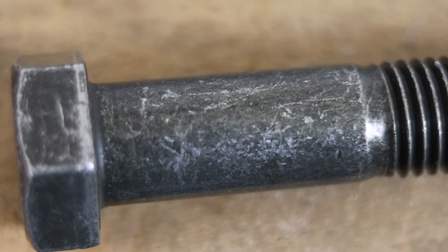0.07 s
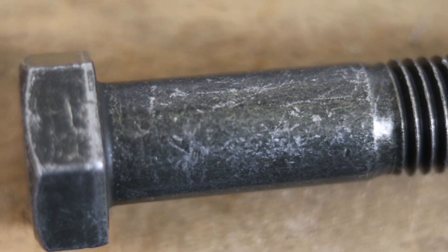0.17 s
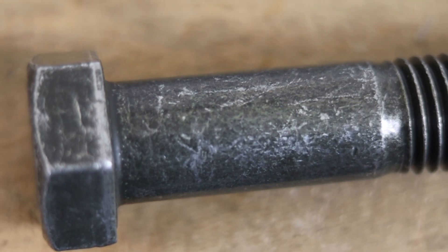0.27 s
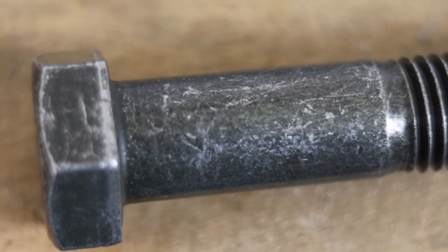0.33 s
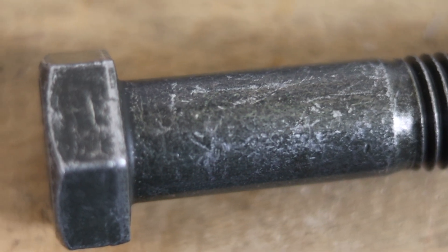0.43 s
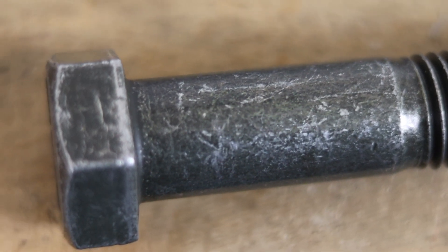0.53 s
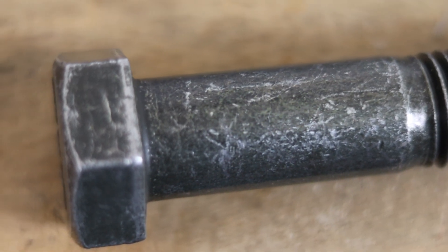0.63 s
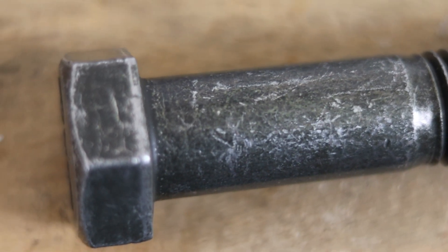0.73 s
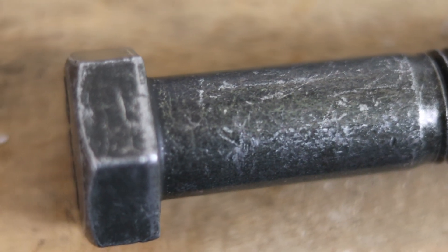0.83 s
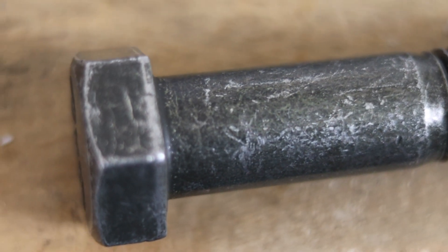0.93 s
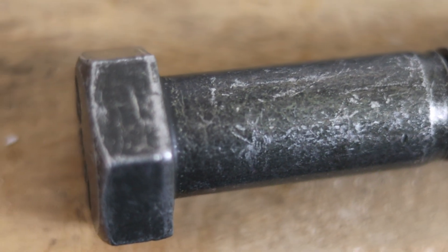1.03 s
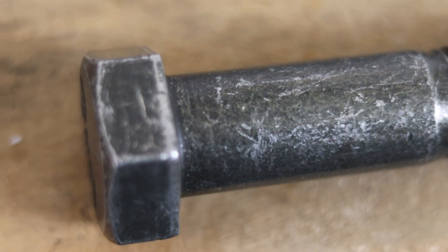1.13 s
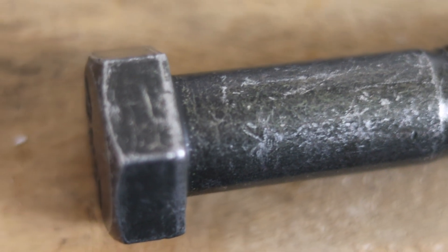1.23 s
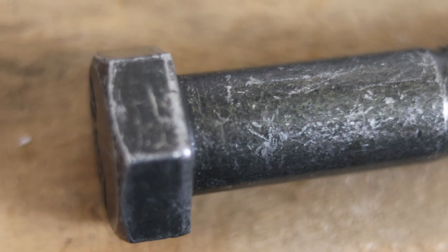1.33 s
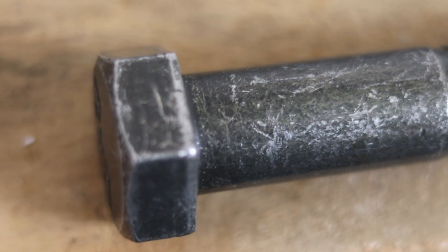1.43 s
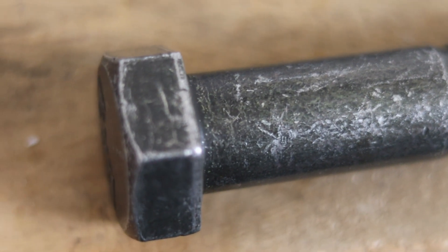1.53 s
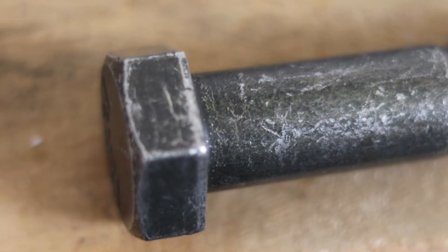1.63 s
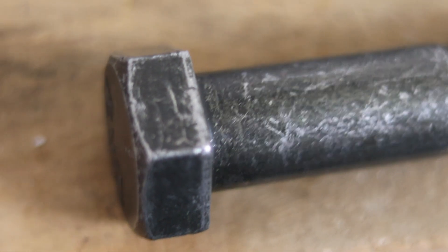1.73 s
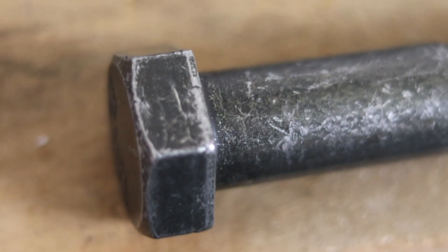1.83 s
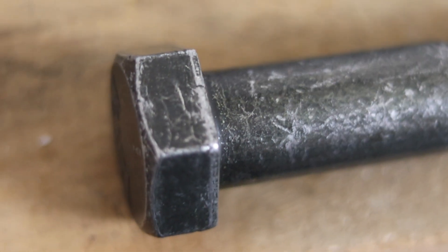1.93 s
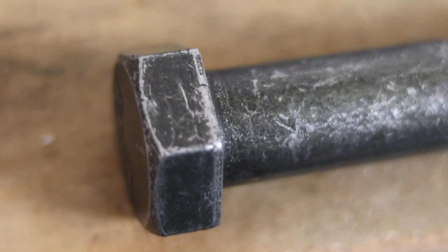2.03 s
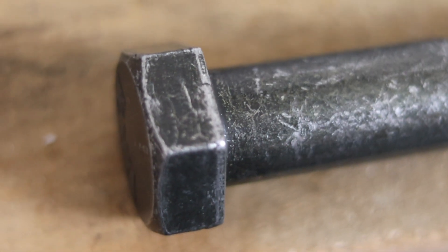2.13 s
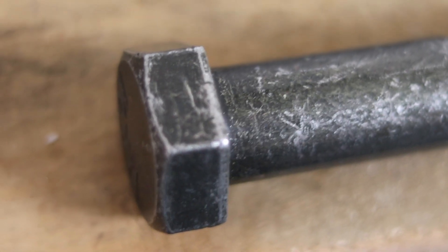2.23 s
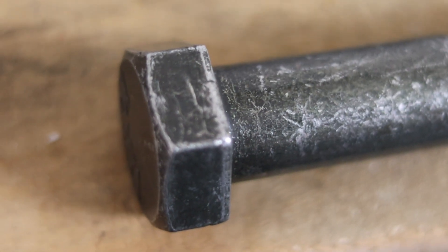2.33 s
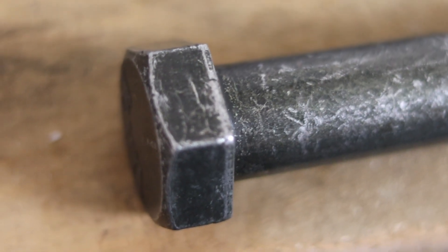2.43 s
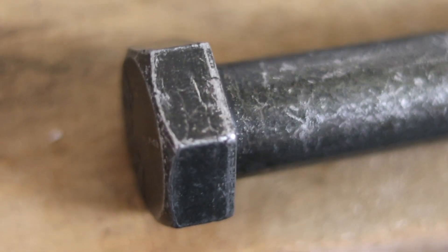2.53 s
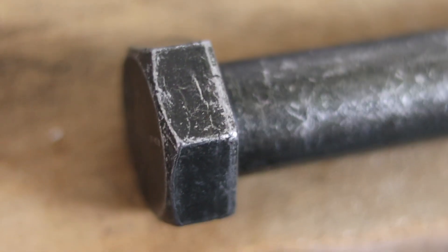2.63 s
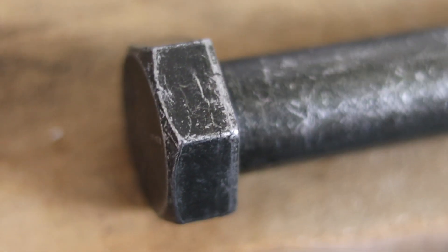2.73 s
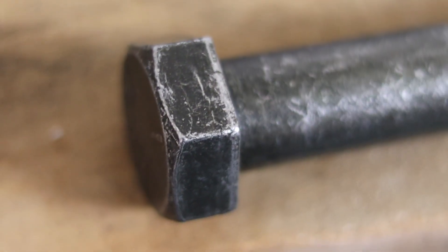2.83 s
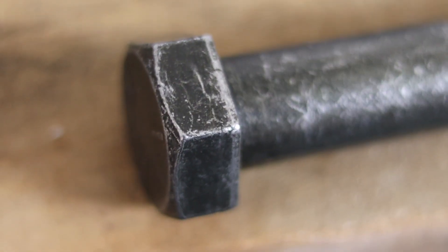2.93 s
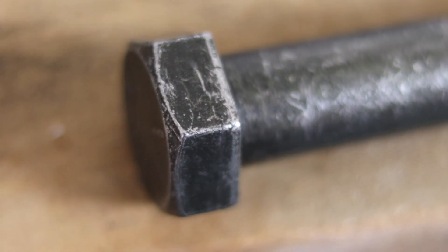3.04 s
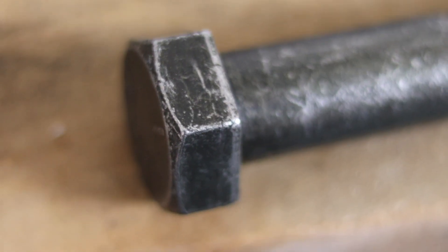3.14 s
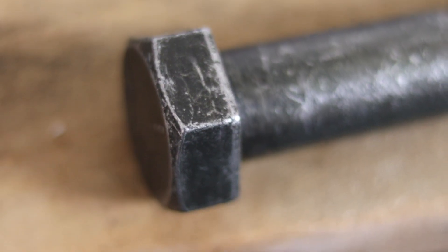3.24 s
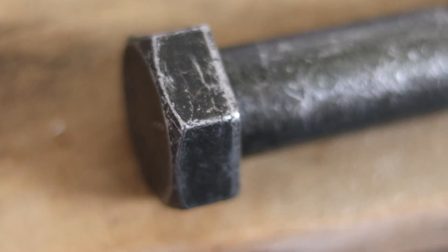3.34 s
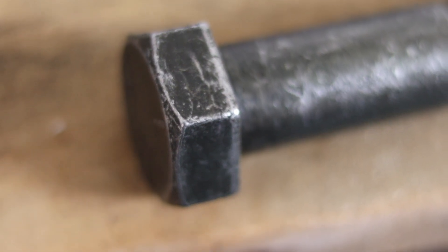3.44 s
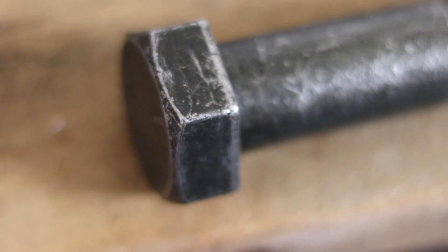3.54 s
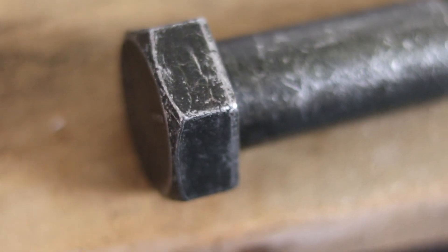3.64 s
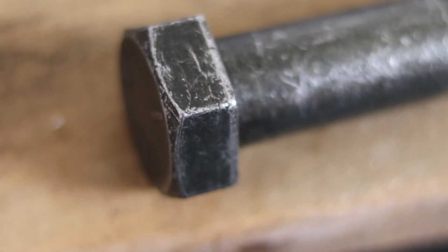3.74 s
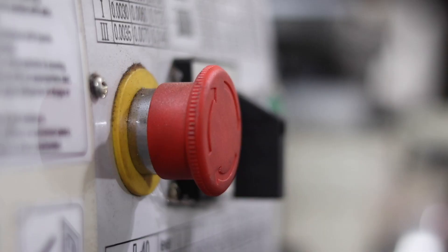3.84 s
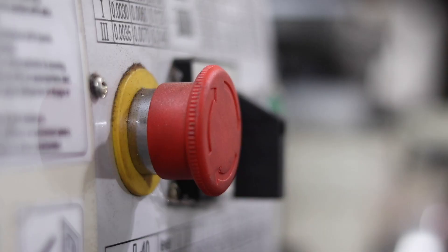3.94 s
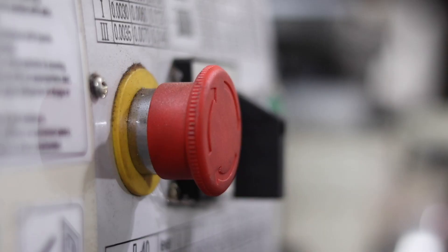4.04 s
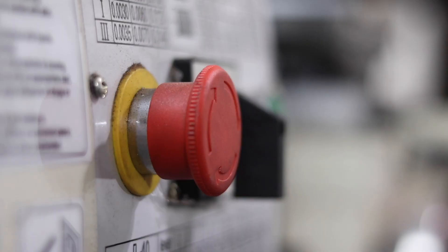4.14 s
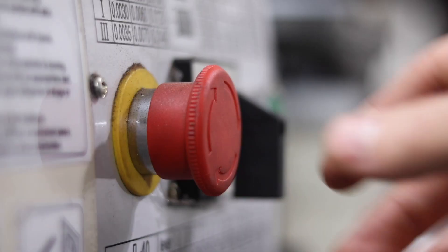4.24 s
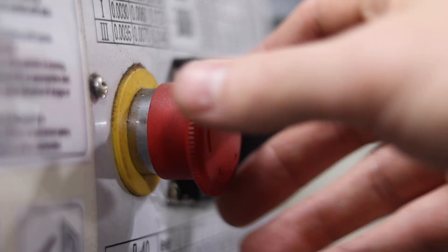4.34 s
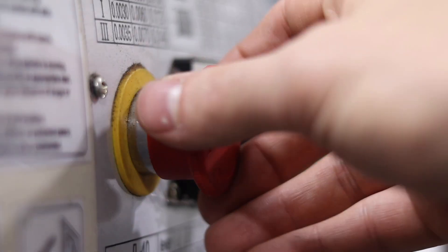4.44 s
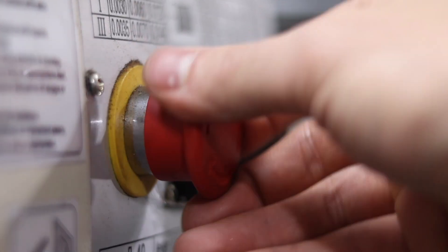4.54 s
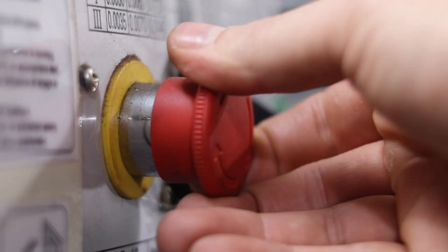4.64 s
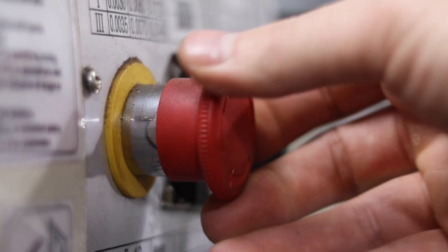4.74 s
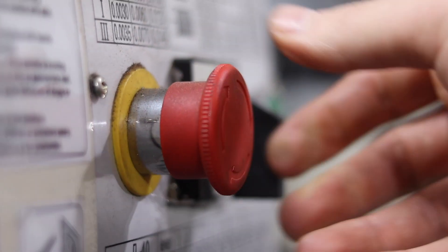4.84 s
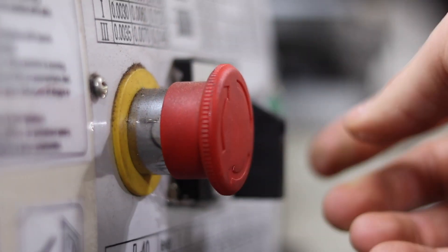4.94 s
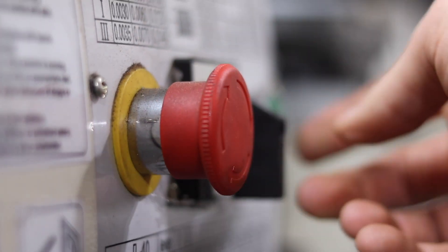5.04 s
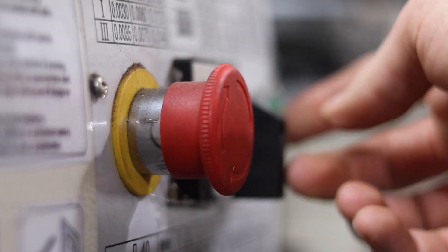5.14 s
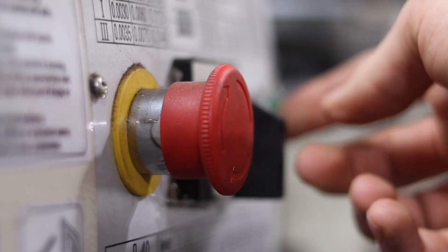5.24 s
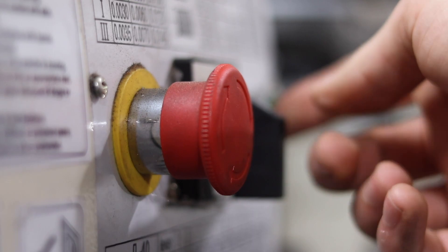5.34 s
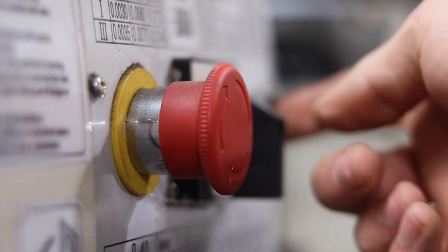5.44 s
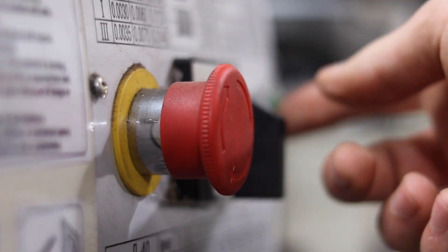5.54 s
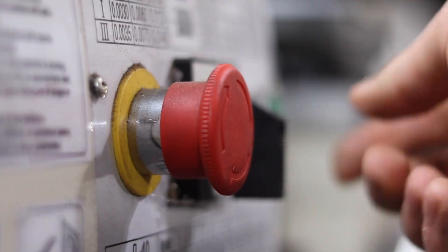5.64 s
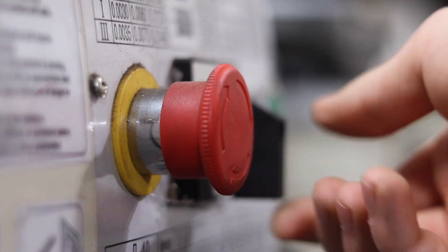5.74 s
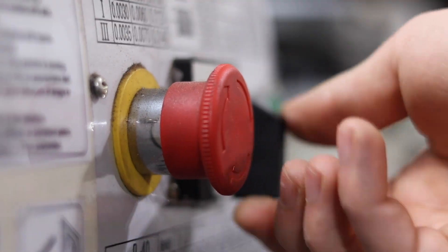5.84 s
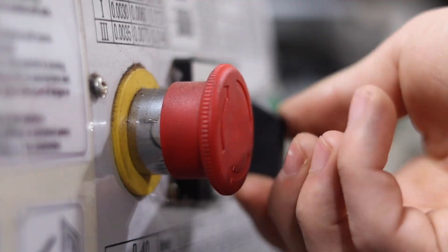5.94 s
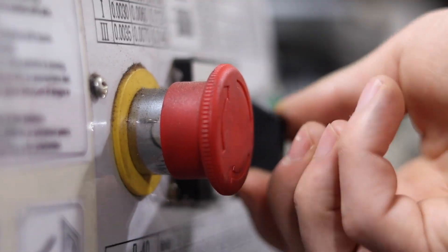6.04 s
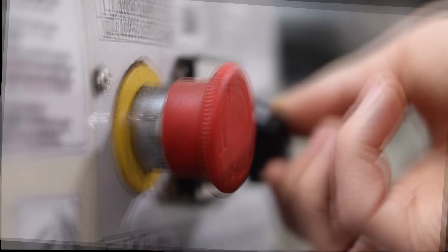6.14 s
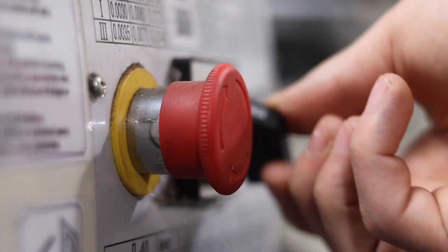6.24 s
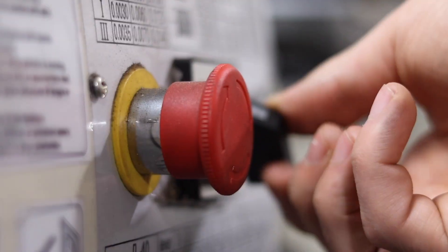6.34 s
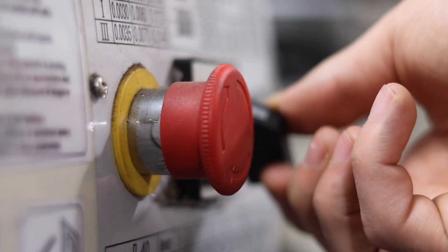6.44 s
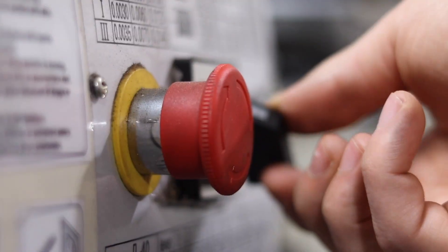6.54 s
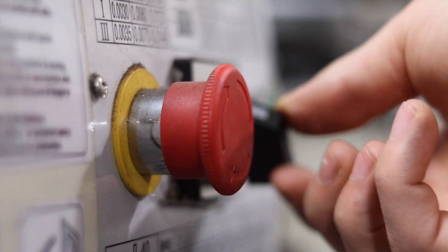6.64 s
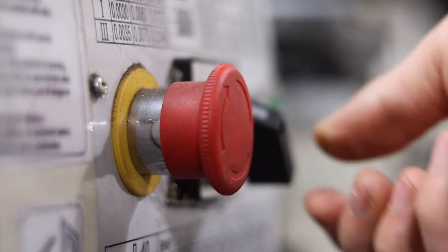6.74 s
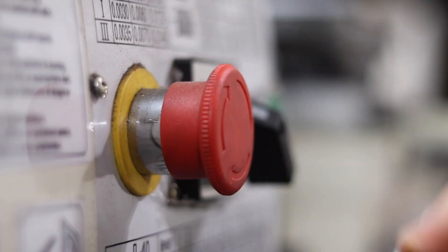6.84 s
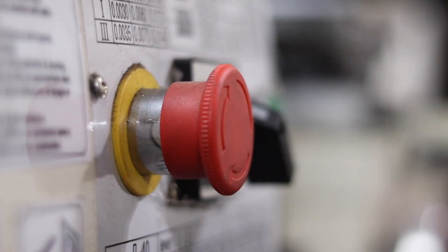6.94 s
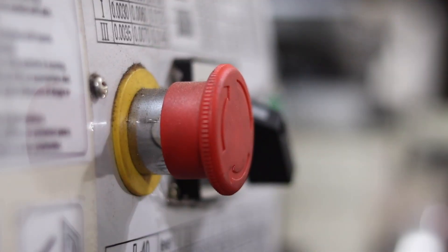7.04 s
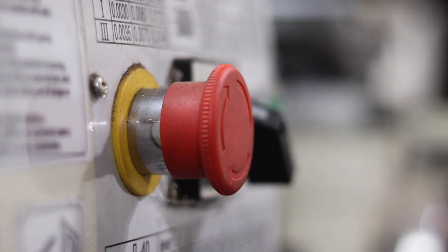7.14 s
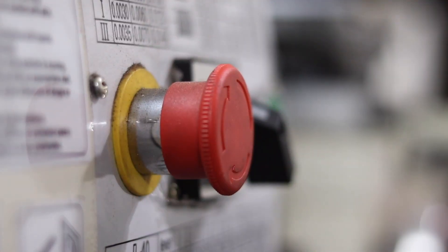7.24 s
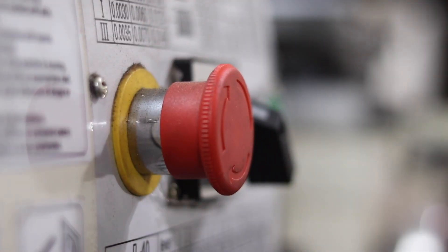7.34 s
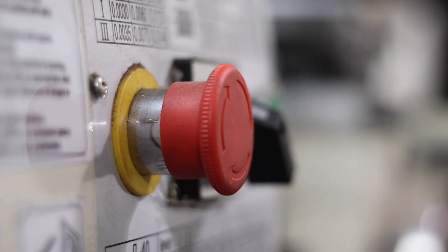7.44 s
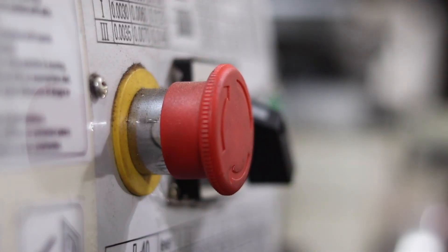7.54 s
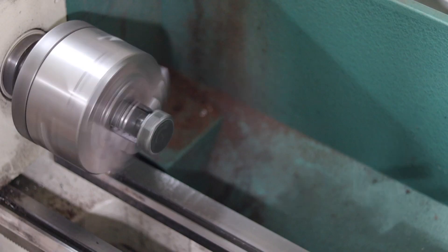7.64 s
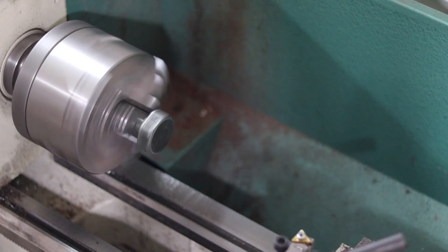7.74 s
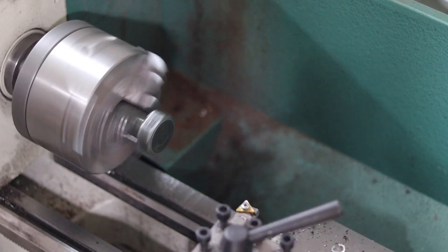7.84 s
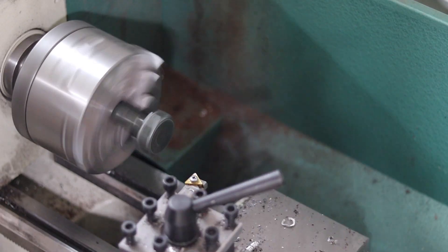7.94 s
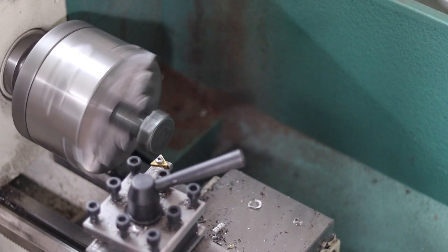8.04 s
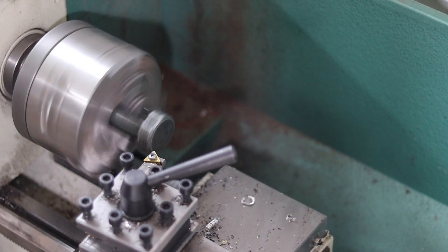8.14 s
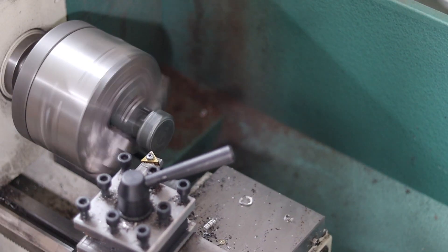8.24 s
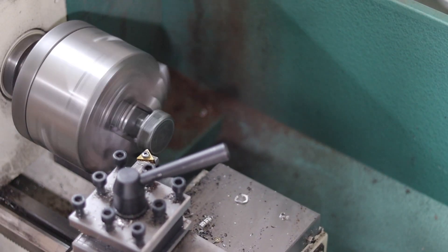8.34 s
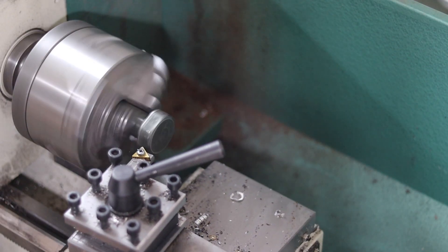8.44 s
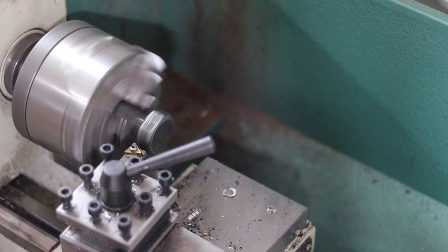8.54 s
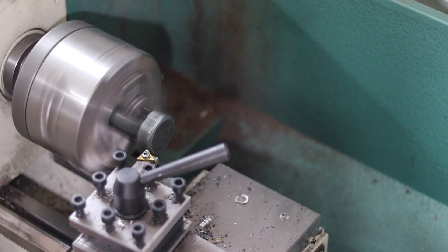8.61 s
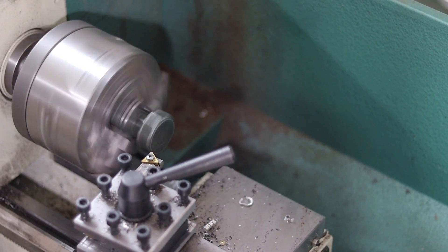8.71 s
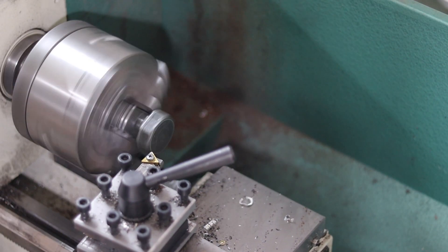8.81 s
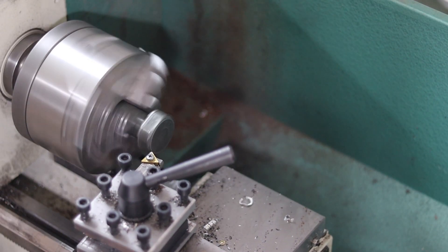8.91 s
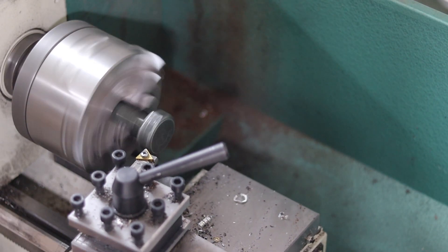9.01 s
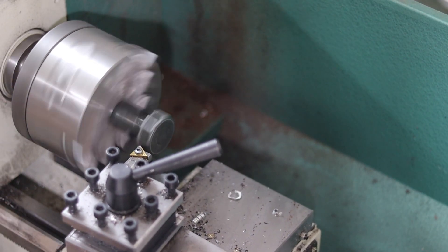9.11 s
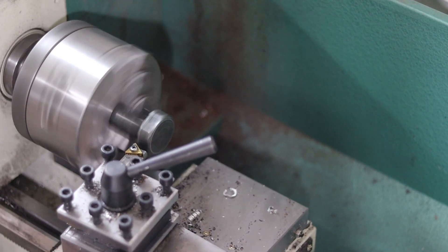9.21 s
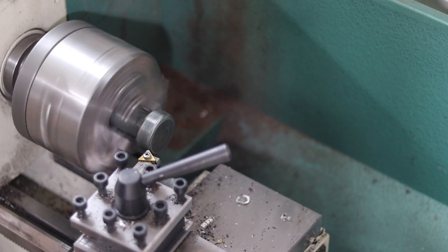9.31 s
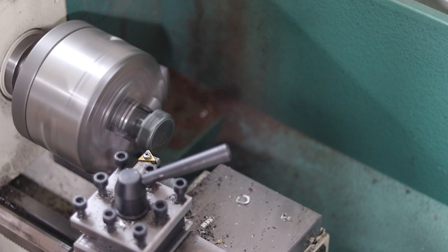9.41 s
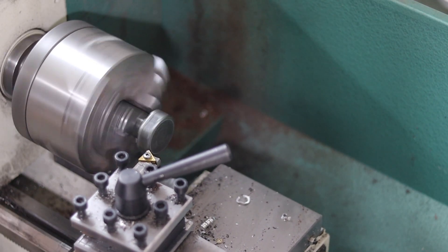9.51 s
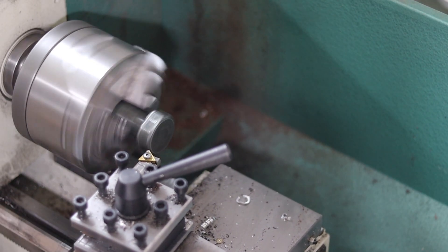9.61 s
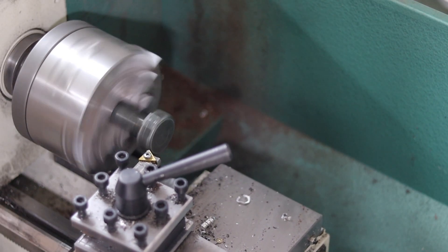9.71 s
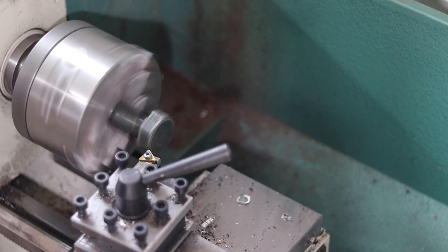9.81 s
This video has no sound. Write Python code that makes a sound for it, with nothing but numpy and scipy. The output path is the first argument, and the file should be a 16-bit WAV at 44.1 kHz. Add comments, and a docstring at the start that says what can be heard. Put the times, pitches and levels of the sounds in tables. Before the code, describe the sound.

Workshop fan hum cuts off, a stop button snaps loose, a contactor clacks, then a metal lathe growls up to speed and whines.

```python
"""Workshop lathe starting up

A workshop fan hums and breaks off. On a metal lathe the stop button snaps free, a contactor clacks in and a
switch is thrown: the motor growls up to speed and the gears whine, their tooth errors repeating every turn.
Then the lathe is heard from beside the chuck, throbbing in another gear, while the tool slide clinks.
Tones locked to the turning shaft make the whine, filtered noise the rush and scraping, and short noise bursts
with ringing modes the blows.
"""
import sys
import numpy as np
from scipy import signal
from scipy.fft import rfft, irfft
from scipy.io import wavfile

SR = 44100
rng = np.random.default_rng(int(sys.argv[2]) if len(sys.argv) > 2 else 0)


def generate_wav(signal):
    """Clip the signal to [-1, 1] and save it as 16-bit WAV at the path in sys.argv[1]."""
    frames = np.transpose(np.atleast_2d(signal))
    scaled = np.clip(frames, -1, 1) * 32767
    pcm = np.round(scaled).astype(np.int16)
    wavfile.write(sys.argv[1], SR, pcm)


N = 435282
T = np.arange(N) / SR  # time in s
FREQ = np.maximum(np.arange(N // 2 + 1) * SR / N, 1)  # frequencies of the spectrum in Hz

START_S, CHUCK_S = 6.21, 7.64  # the switch is thrown; the lathe is heard from beside the chuck
CHUCK_TURN_HZ = 6.52  # turning rate of the chuck

# headstock resonances: f/Hz, half-width/Hz, level/dB
HEADSTOCK = [(214, 77, -8.5), (363, 60, -9.5), (508, 75, -6), (700, 44, 6), (748, 35, 4.5), (787, 13, -18),
             (1010, 59, -12), (1446, 43, -11.5)]
# resonances shaken by the starting motor and by heavy blows: f/Hz, half-width/Hz, level/dB
MOUNT = [(187, 33, -0.5), (253, 12, 0), (362, 55, -10), (495, 62, -8), (622, 54, -7), (824, 40, -4.5),
         (955, 130, -12), (1760, 250, -20.5)]


def lathe_start(clatter_db=-25, rumble_db=-28, growl_db=-3, groan_db=0, slot_db=-7, throb_db=3,
                pan_db=.5, lumpy_db=1.0):
    """The motor strains against its mounts, then the gears settle into a whine."""
    # gear tones: multiple of the shaft rate, level/dB; the mesh, its harmonics and their sidebands
    gear_rows = [(16, -41), (32, -36.5), (44, -42), (48, -19.5), (49, -40), (90, -31), (91, -31), (92, -36),
                 (94, -33), (96, -26), (99, -34), (100, -33.5), (144, -42.5), (197, -46)]
    # steady colour of the casing: f/Hz, level per Hz/dB
    casing_colour = [(500, -28.5), (850, 3.5), (938, -18), (1100, -9), (1240, -14.5), (1460, -11),
                     (1630, -15.5), (2140, -14), (3240, -19.5), (8140, -28), (10000, -34.5), (15000, -39),
                     (16000, -41)]
    # casing resonances that the rotor-slot whine sweeps through: f/Hz, half-width/Hz, level/dB
    motor_shell = [(1450, 170, -3), (1850, 100, 0), (2200, 170, -4), (2540, 120, -6)]
    mesh_hz, teeth = 357.9, 48  # tooth contacts per second at full speed, contacts per turn
    casing_db, strained_casing_db = -30, -19.5

    speed, strain, load_db = run_up()
    turns = np.cumsum(mesh_hz * speed) / SR / teeth
    # count the turns from 7.19 s and let the shaft waver slightly
    turns = turns - np.interp(7.19, T, turns) + 0.000384 * walk(6.0)
    body, mount, casing = resonances(HEADSTOCK), resonances(MOUNT), colour(casing_colour)

    # the off-centre wheel presses harder once a turn
    throb = undb(throb_db * np.cos(2 * np.pi * turns))
    clatter = throb * (undb(clatter_db) * tooth_errors(turns, body) + undb(rumble_db) * noise(body))
    # the clean whine comes through mainly near full speed
    whine = gear_tones(turns, gear_rows, 0.0806) * speed ** 4
    gears = (whine + clatter) * undb(load_db)

    # teeth scrape, harder under strain, partly in the same way at every turn
    repeating = tooth_errors(turns, casing / (1 + (FREQ / 5000) ** 2))
    scrape = noise(casing) + undb(-6.5) * repeating
    scrape = scrape * (undb(casing_db) + strain * undb(strained_casing_db))

    # the rough mesh groans as it sweeps through the mount's resonances
    mesh_phase = 2 * np.pi * teeth * turns
    rough_mesh = np.sin(mesh_phase + 1.1 * walk(50))
    groan = undb(groan_db) * irfft(rfft(rough_mesh) * mount, N)
    # the rotor slots sing at eight times the mesh and fall silent at full speed
    slot_tone = np.sin(8 * mesh_phase + 1.1 * walk(110)) * np.sqrt(1 - speed ** 2)
    slots = undb(slot_db) * irfft(rfft(slot_tone) * resonances(motor_shell), N)
    lumps = undb(lumpy_db * walk(40))
    growl = strain * ((undb(growl_db) * noise(mount) + groan) * lumps + slots)
    return (gears + scrape + growl) * between(START_S, CHUCK_S) * undb([[pan_db], [-pan_db]])


def run_up():
    """The motor kicks in at part speed and gains speed exponentially until it locks, straining as it starts.

    Returns the share of full speed, the strain (gain) and the gear load (dB).
    """
    kick_share, run_up_s = .385, .23
    # strain: attack, hold, a quick release, and a part that lingers while the drive settles
    strain_db, rise_db, attack_s, hold_s, t60_s = -11.5, 18.5, 0.1, 0.19, 0.25
    linger_db, linger_t60_s = -5.5, 1.2
    # gear gain at full speed, its growth per doubling of speed, and its steady sag
    gear_db, gear_db_per_octave, sag_db_per_s = 3, 16, 1.56

    t, eased = since(START_S), since(START_S + hold_s)
    speed = kick_share ** np.maximum(1 - t / run_up_s, 0)
    attack = undb(strain_db - rise_db * np.maximum(1 - t / attack_s, 0))
    release = np.maximum(fade(eased, t60_s), undb(linger_db) * fade(eased, linger_t60_s))
    load_db = gear_db + gear_db_per_octave * np.log2(speed) - sag_db_per_s * t
    return speed, attack * release, load_db


def lathe_chuck(gears_db=0, clatter_db=-42, rumble_db=-39, rattle_db=3, wind_db=-39.5, gust_db=1.6):
    """Beside the chuck the gear tones beat at the shaft rate over bearing hiss and the jaws' wind."""
    # gear tones at the chuck: multiple of the shaft rate, level/dB
    gear_rows = [(49, -45.5), (53, -39), (54, -29.5), (55, -59), (56, -40), (107, -40), (108, -40.5),
                 (160, -54), (214, -53), (431, -56)]
    # colour of the bearing hiss: f/Hz, level per Hz/dB
    hiss_colour = [(500, -16), (850, 3), (882, -5), (1100, -3.5), (1200, -10), (1440, -5.5), (1630, -10),
                   (2830, -11), (3620, -14.5), (7380, -17.5), (11500, -29.5), (15000, -32), (16000, -39)]
    # colour of the wind: f/Hz, level per Hz/dB
    wind_colour = [(25, -13), (80, -8), (130, 0), (200, -5.5), (280, 5.0), (380, 7.5), (550, 2.0),
                   (820, 4), (1100, -30), (4000, -56)]
    shaft_hz, hiss_level_db = 361.8 / 54, -39

    turns = shaft_hz * (T - 8.15) + .0008 * walk(7.3)
    hiss_dip_db, gear_dip_db = dips()
    body = resonances(HEADSTOCK)
    gears = gear_tones(turns, gear_rows, 0.22) * undb(gears_db + gear_dip_db + 1.2 * walk(8))
    hum = chuck_hum() * undb(gear_dip_db + 1.5 * walk(4))
    # the gears rattle unevenly in their backlash
    rattle = undb(rumble_db + rattle_db * walk(40)) * noise(body, side_db=-9.5)
    clatter = undb(clatter_db) * tooth_errors(turns, body) + rattle
    # the wind swells once per turn of the chuck
    gusts = gust_db * np.cos(2 * np.pi * CHUCK_TURN_HZ * (T - 8.21))
    wind = undb(wind_db + gusts) * noise(colour(wind_colour), side_db=8.5)
    hiss = noise(colour(hiss_colour), side_db=-9.5) * undb(hiss_level_db + hiss_dip_db + .5 * walk(25))
    return (gears + hum + clatter + wind + hiss) * between(CHUCK_S - .005, 20)


def dips():
    """Changes of the hiss and gear levels (dB) at the chuck: each dip falls quickly and recovers slowly."""
    # brief dips: t/s, hiss level/dB, gear level/dB
    dip_rows = [(8.47, -5, -3.5), (9.19, -2.5, -5)]
    fall_s, recover_s = 0.0097, 0.23
    total = 0
    for s, *depths_db in dip_rows:
        course = np.minimum(since(s) / fall_s, 1) * np.exp(-since(s) / recover_s)
        total = total + np.outer(depths_db, course)
    return total


def chuck_hum():
    """Motor hum that beats with its sidebands once per turn of the chuck."""
    # hum: f/Hz, level/dB, level/dB of a sideband one chuck rate lower
    hum_rows = [(122, -49, -44.5), (243.5, -48, -52.5)]
    t = T - 8.21
    hum = 0
    for hz, db, sideband_db in hum_rows:
        hum = hum + undb(db) * np.cos(2 * np.pi * hz * t)
        hum = hum + undb(sideband_db) * np.cos(2 * np.pi * (hz - CHUCK_TURN_HZ) * t)
    return np.sqrt(2) * hum


def tooth_errors(turns, gain, size=8192):
    """Each tooth has its own error, so the same clatter comes round with every turn."""
    wheel = irfft(np.exp(2j * np.pi * rng.random(size // 2 + 1)))
    return shape(np.interp(turns % 1 * size, np.arange(size), wheel), gain)


def gear_tones(turns, rows, scatter):
    """Clean tones locked to the shaft; sidebands close to the strongest tone swell with it once a turn."""
    mesh = round(max(rows, key=lambda row: row[1])[0])
    tones = 0
    for k, db in rows:
        # start phases, in turns, scatter more the further a tone is from the strongest one
        phase = scatter * (round(k) - mesh) * rng.uniform(-1, 1)
        tones = tones + undb(db) * np.sqrt(2) * np.cos(2 * np.pi * (round(k) * turns + phase))
    return tones


def clicks(ring_db=-11, ring_growth=0.2, dull_t60=.52, bright_t60=0.26, contact_db=1, contact_t60=0.0062,
           crack_db=-2):
    """Plastic snaps: a hard contact, a crack, the housing's ring and a room tail that loses its treble first."""
    # colour of the plastic: f/Hz, level per Hz/dB
    plastic = [(60, -50), (160, -9), (330, -16), (620, -16), (850, -11.5), (1200, -7.5), (1800, -8.5),
               (2800, -17), (3800, -14.5), (6000, -22.5), (8300, -22), (10500, -29.5), (13700, -23),
               (16000, -34)]
    # modes of the button housing: f/Hz, level/dB, t60/s
    housing_modes = [(187, -0.5, 1.1), (487, 1, 1.13), (667.5, -12, 2.8), (780, -14, 2.3), (856, 6.5, 0.25),
                     (915, 11, 0.18), (1344, -9.5, .35), (1506, 1, 0.44), (1570, -17, 0.34),
                     (1755, 17.5, 0.1), (1900, -10, 0.59), (1906, -15, 0.68), (1944, 2, 0.21),
                     (2390, -14.5, 0.56), (3370, -1, 0.33), (4107, -14.5, 0.56)]
    # small dry ticks in the workshop: t/s, level/dB, pitch f/Hz
    tick_rows = [(1.794, -35.5, 1200), (1.832, -24, 1190), (2.099, -47, 2150), (2.469, -49, 2300),
                 (2.63, -50, 2500), (3.508, -45, 2600)]
    # fingers land on the controls: t/s, level/dB, pitch f/Hz
    touch_rows = [(4.387, -50, 2950), (4.572, -45.5, 1800), (4.592, -41.5, 1800), (5.386, -47.5, 2090),
                  (6.181, -37.5, 950)]
    # stop button and switch snap over: t/s, level/dB, room tail/dB, treble/dB, bass/dB, pitch f/Hz
    snap_rows = [(4.619, -22, -8.5, 6.5, 9.5, 1010), (4.720, -15, -13, -11.5, 3.5, 1700),
                 (4.803, -6, -15, -7, -11.5, 1930), (6.2004, -5.5, -17.5, 7, -6.5, 1120)]

    out, t = np.zeros((2, N)), T[:SR]
    crack_noise, bright = noise(colour(plastic), side_db=-8.5), noise(colour(plastic), side_db=2.5)
    dull = noise(colour(plastic) / (1 + (FREQ / 3000) ** 2), side_db=2.5)
    contact_noise = noise(colour(plastic) * (1 + FREQ / 7000), side_db=-13)

    def click(s, db, hz, t60, tail_db, treble_db, bass_db, pitch_db, overtone):
        """One click; the harder it is, the larger the housing's share of the sound."""
        housing = undb(ring_db + ring_growth * db) * ring(housing_modes)
        tail = stretch(bright) * fade(t, bright_t60) * undb(-2)
        tail = tail + stretch(dull) * fade(t, dull_t60) * undb(-4.5) + housing
        contact = undb(contact_db) * stretch(contact_noise) * fade(t, contact_t60)
        crack = undb(crack_db) * stretch(crack_noise) * fade(t, t60)
        onset = 1 - np.exp(-t / 0.00014)
        snap = (contact + crack + undb(tail_db) * tail) * onset
        add(out, s, undb(db) * tone(knock(snap, hz, pitch_db, overtone), treble_db, bass_db))

    for s, db, hz in tick_rows:
        click(s, db, hz, t60=0.023, tail_db=-34, treble_db=-6.5, bass_db=5, pitch_db=7.5, overtone=2.57)
    for s, db, hz in touch_rows:
        click(s, db, hz, t60=0.13, tail_db=-0.5, treble_db=-6, bass_db=6.5, pitch_db=7.5, overtone=2.0)
    for s, db, tail_db, treble_db, bass_db, hz in snap_rows:
        click(s, db, hz, t60=0.038, tail_db=tail_db, treble_db=treble_db, bass_db=bass_db,
              pitch_db=7.0, overtone=1.93)
    return out


def contactor(ring_db=-9, boom_db=-13, boom_t60=0.7, tick_db=-14, tick_t60=0.05):
    """The armature slams in and chatters, later the drive jolts; each knock ticks, rings the panels and booms."""
    # colour of the cabinet: f/Hz, level per Hz/dB
    cabinet = [(59, -46), (100, -27.5), (181, -2), (398, -19), (502, -13), (818, -22), (1200, -6),
               (1650, -16), (1870, -12), (2130, -10.5), (2750, -10), (3050, -11.5), (4200, -14),
               (13200, -35.5), (16000, -47)]
    # sheet-metal modes of the cabinet: f/Hz, level/dB, t60/s
    panel_modes = [(146.8, -3, 0.94), (182.6, -3.5, .8), (232, -2, 0.96), (299, -1.5, 0.9), (362, -9, 0.95),
                   (514, -6.5, 0.73), (1200, -1, 0.25), (1240, 1.5, 0.24), (1873, -5, 0.45),
                   (1900, 4, 0.22), (2500, -12, .4), (2720, -3.5, 0.34), (3400, -7, 0.17), (3700, -5, 0.23),
                   (4285, -2, 0.19), (4506, -13, 0.23)]
    # the contactor, then the drive taking up its slack: t/s, level/dB, rise/s, t60/s, treble/dB, bass/dB
    knock_rows = [(5.422, -33.5, 0.0016, 0.1, 10, -2), (5.436, -16, 0.0035, 0.17, 8.5, -7),
                  (5.464, -26.5, 0.0034, 0.54, 0, 6), (5.602, -29, 0.0017, 0.21, -1.5, 0),
                  (6.304, -36, 0.0023, .25, 26, -2)]

    out, t = np.zeros((2, N)), T[:SR]
    clatter = noise(colour(cabinet), side_db=3) * undb(1.6 * walk(250))
    boom = noise(resonances(MOUNT))
    ticks = noise(resonances([(13600, 2100, 0)]), side_db=-8) * undb(4 * walk(400))
    for s, db, rise, t60, treble_db, bass_db in knock_rows:
        blow = stretch(clatter) * fade(t, t60)
        blow = blow + undb(tick_db) * stretch(ticks) * fade(t, tick_t60)
        blow = blow + undb(ring_db) * ring(panel_modes)
        blow = blow + undb(boom_db) * stretch(boom) * fade(t, boom_t60)
        add(out, s, undb(db) * tone(blow * (1 - np.exp(-t / rise)), treble_db, bass_db))
    return out


def slide(t60=0.16, rub_db=-1, ring_db=-9, bump_t60=0.11):
    """Brief steel clinks as the tool slide takes up its play; the carriage bumps dully."""
    # clinks: t/s, level/dB
    clink_rows = [(8.452, -42), (8.518, -34), (8.551, -41), (8.591, -32), (9.132, -26), (9.169, -24.5),
                  (9.182, -29), (9.278, -39)]
    # resonances of the slide: f/Hz, half-width/Hz, level/dB
    slide_resonances = [(380, 90, 9), (900, 400, -3), (1720, 190, -1), (3200, 190, -4), (3700, 180, -10)]
    # modes of the slide: f/Hz, level/dB, t60/s
    steel_modes = [(1810, -2, 0.18), (2000, -4, 0.23), (3200, 6, 0.087), (3320, -9, 0.091),
                   (3850, -2, 0.089)]
    # dull bumps of the carriage: t/s, level/dB
    bump_rows = [(8.45, -24.5), (9.73, -30)]

    out, t = np.zeros((2, N)), T[:SR]
    rub, body = noise(resonances(slide_resonances)), noise(resonances(MOUNT))
    for s, db in clink_rows:
        clink = undb(rub_db) * stretch(rub) * fade(t, t60) + undb(ring_db) * ring(steel_modes)
        add(out, s, undb(db) * clink * (1 - np.exp(-t / 0.0011)))
    for s, db in bump_rows:
        add(out, s, undb(db) * (stretch(body) + stretch(rub)) / 2 * fade(t, bump_t60))
    return out


def workshop():
    """Duct rush and wavering fan tones over the room's low rumble, which is left alone when the fan stops."""
    # colour of the fan's rush: f/Hz, level per Hz/dB
    fan_colour = [(41, -36), (70, -30), (80, -21), (113, -0.5), (159, -10.5), (244, -1), (336, -10.5),
                  (506, -10.5), (1070, -29), (1370, -31.5), (2270, -41), (4580, -43), (4910, -44.5),
                  (14300, -53), (16000, -59)]
    # fan tones: f/Hz, level/dB
    fan_tones = [(52, -55.5), (119.5, -42.5), (241, -48), (248, -50.5), (4330, -76.5), (4600, -77)]
    # colour of the room: f/Hz, level per Hz/dB
    room_colour = [(13, -50), (22, -18.5), (37, -13.5), (59, -6.5), (87, -15.5), (103, -19.5), (319, -24),
                   (347, -26.5), (409, -28.5), (636, -35), (988, -36.5), (3610, -46), (10000, -50.5),
                   (16000, -55)]
    fan_off_s, room_end_s, fan_db, room_db = 3.877, 6.45, -37, -46

    tones = 0
    for hz, db in fan_tones:
        wavering = np.sin(2 * np.pi * hz * T + 0.59 * walk(2.3))
        tones = tones + undb(db) * np.sqrt(2) * wavering * undb(1.1 * walk(2.2))
    rush = noise(colour(fan_colour), side_db=12.5) * undb(fan_db + .5 * walk(8.5))
    room = noise(colour(room_colour), side_db=27.0) * undb(room_db)
    fan_on = between(-1, fan_off_s)
    # the rumble is weaker while the fan runs, and ends once the lathe is running
    room_gate = between(fan_off_s, room_end_s) + undb(-5.5) * fan_on
    return (rush + tones) * fan_on + room * room_gate


def ring(modes):
    """Struck modes, a little different at each blow."""
    t = T[:SR]
    total = 0
    for hz, db, t60 in modes:
        mode = fade(t, t60) * np.sin(2 * np.pi * (hz + rng.normal(0, 1)) * t)
        total = total + undb(db) * mode * rng.choice([-1, 1])
    return total


def knock(x, hz, db, overtone, octaves=0.46, overtone_db=5, overtone_octaves=0.15):
    """Each struck part favours its own pitch and one overtone (a multiple of the pitch)."""
    above = np.log2(np.arange(1, SR // 2 + 2) / hz)  # octaves above the pitch
    lift = db * np.exp(-(above / octaves) ** 2)
    lift = lift + overtone_db * np.exp(-((above - np.log2(overtone)) / overtone_octaves) ** 2)
    return irfft(rfft(x) * undb(lift), SR)


def tone(x, treble_db, bass_db):
    """Hard contacts are bright, heavy ones add low end; cut below 125 Hz and faded to silence within 1 s."""
    f = np.arange(SR // 2 + 1)
    treble = treble_db * f ** 2 / (f ** 2 + 5000 ** 2)
    bass = bass_db / (1 + (f / 700) ** 2)
    x = irfft(rfft(x) * undb(treble + bass), SR)
    x = signal.sosfilt(signal.butter(3, 125, "high", fs=SR, output="sos"), x)
    return x * np.minimum(2 - 2 * T[:SR], 1) ** 2


def noise(gain, side_db=0):
    """Coloured stereo noise of rms 1, wider toward the treble."""
    # stereo width: f/Hz, side minus mid level/dB
    width = [(30, -59), (100, -37), (300, -34), (700, -26.5), (1400, -20), (2800, -13), (4500, -8.5),
             (8000, 2.5), (15000, 5.5)]
    mid, side = rfft(rng.standard_normal((2, N))) * gain
    side = side * np.minimum(colour(width) * undb(side_db), 1.1)
    mid, side = irfft(mid, N), irfft(side, N)
    return unit(np.array([mid + side, mid - side]))


def walk(rate):
    """Random wandering of rms 1; a higher rate (Hz) wanders faster."""
    return shape(rng.standard_normal(N), np.exp(-(FREQ / rate) ** 2))


def colour(points):
    """Gain per frequency, joining points of f/Hz and level/dB."""
    hz, db = np.transpose(points)
    return undb(np.interp(np.log(FREQ), np.log(hz), db))


def resonances(rows):
    """Gain per frequency of a set of resonances, added as powers."""
    power = 0
    for hz, width, db in rows:
        detuning = (FREQ - hz ** 2 / FREQ) / (2 * width)
        power = power + undb(db) ** 2 / (1 + detuning ** 2) ** 2
    return np.sqrt(power)


def shape(x, gain):
    """Filter by a gain per frequency, to rms 1."""
    return unit(irfft(rfft(x) * gain, N))


def unit(x):
    """Scale to rms 1."""
    return x / np.sqrt(np.mean(x ** 2))


def undb(db):
    """Decibels to gain."""
    return 10 ** (np.asarray(db) / 20)


def fade(t, t60):
    """Exponential decay by 60 dB in t60 seconds."""
    return np.exp(-np.log(1000) * t / np.maximum(t60, 1e-3))


def since(s):
    """Seconds since time s, zero before it."""
    return np.maximum(T - s, 0)


def between(start, end):
    """A gate with 10 ms edges."""
    return np.clip((T - start) * 100, 0, 1) * np.clip((end - T) * 100 + .5, 0, 1)


def stretch(x):
    """One second from a random place in a noise."""
    i = rng.integers(N - SR)
    return x[:, i:i + SR]


def add(out, s, x):
    """Mix a sound in at time s."""
    i = int(s * SR)
    out[:, i:i + x.shape[1]] += x[:, :N - i]


def scene():
    """All sources together."""
    return lathe_start() + lathe_chuck() + clicks() + contactor() + slide() + workshop()


def record(dry):
    """The recorder clips at full scale and cuts the treble above 16 kHz."""
    top_cut = signal.ellip(10, .2, 80, 16000, fs=SR, output="sos")
    return signal.sosfilt(top_cut, np.clip(dry, -1, 1))


dry = scene()
out = record(dry)
generate_wav(out)
```